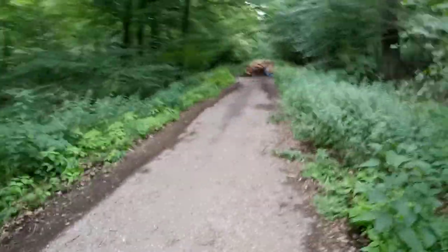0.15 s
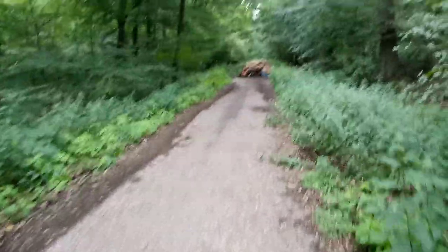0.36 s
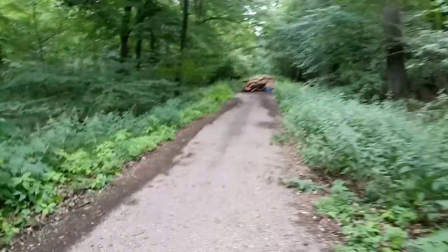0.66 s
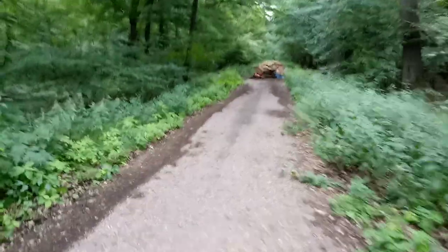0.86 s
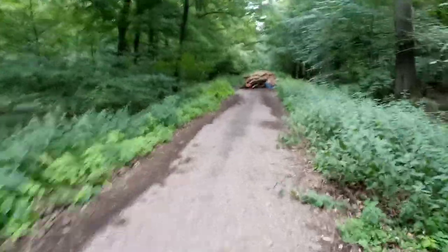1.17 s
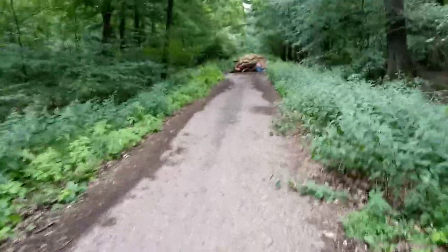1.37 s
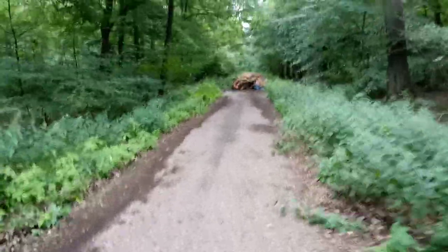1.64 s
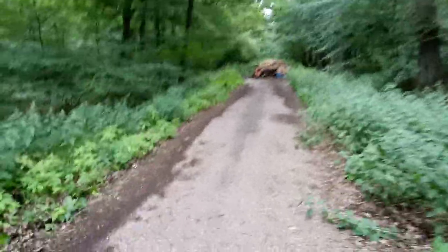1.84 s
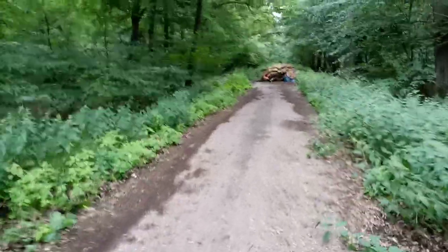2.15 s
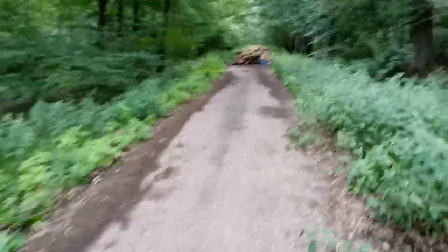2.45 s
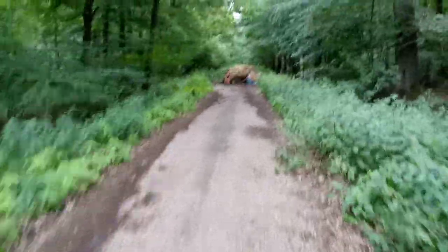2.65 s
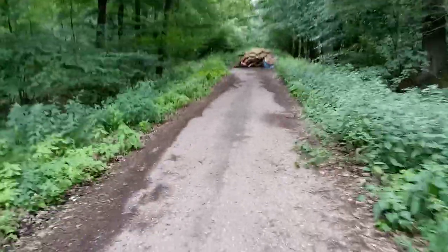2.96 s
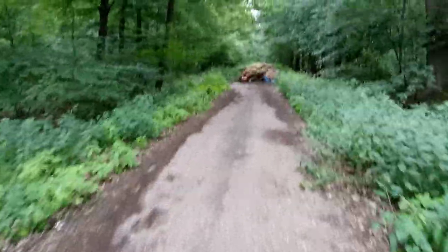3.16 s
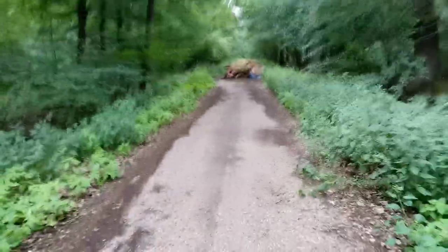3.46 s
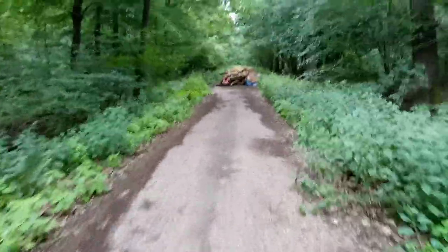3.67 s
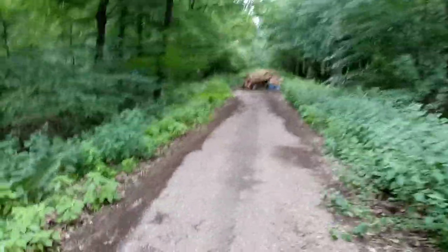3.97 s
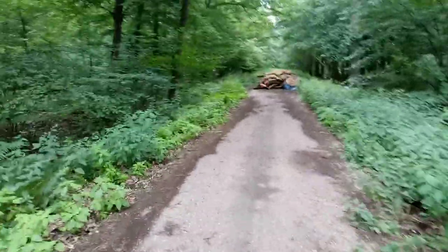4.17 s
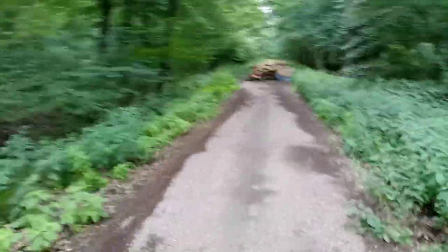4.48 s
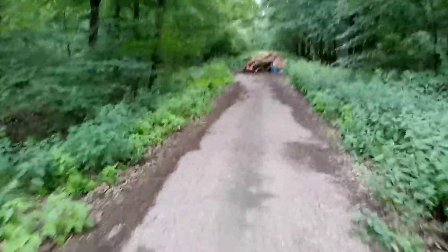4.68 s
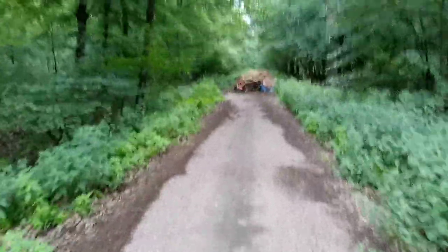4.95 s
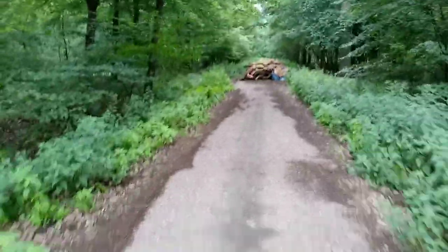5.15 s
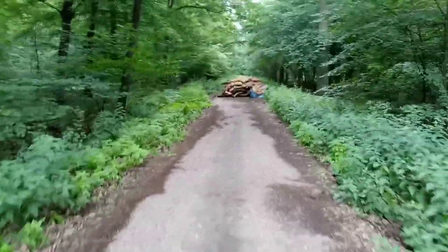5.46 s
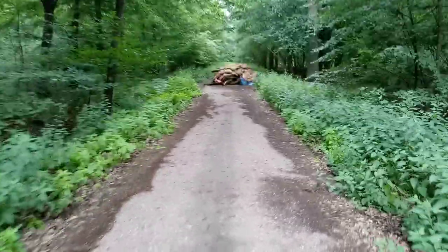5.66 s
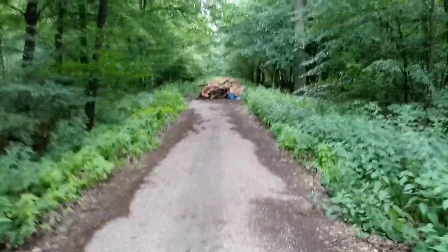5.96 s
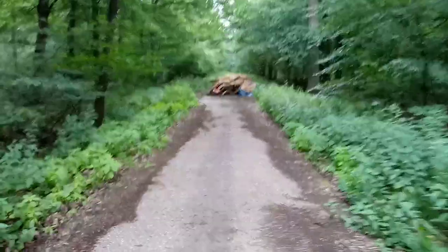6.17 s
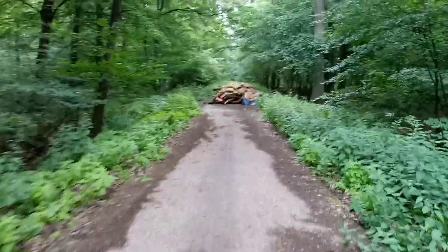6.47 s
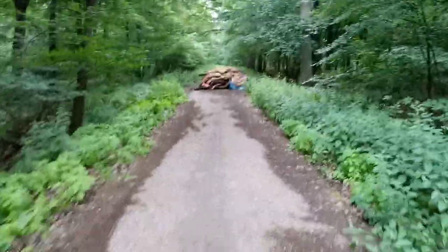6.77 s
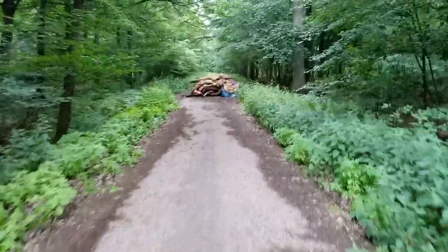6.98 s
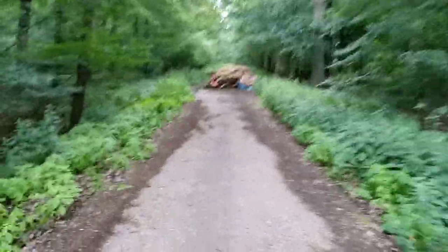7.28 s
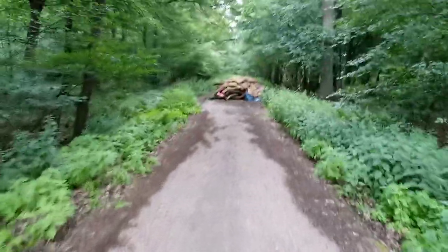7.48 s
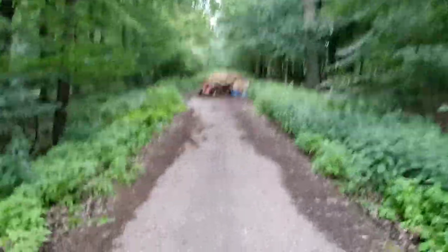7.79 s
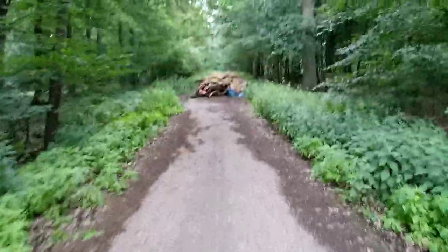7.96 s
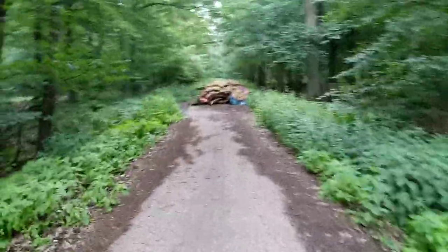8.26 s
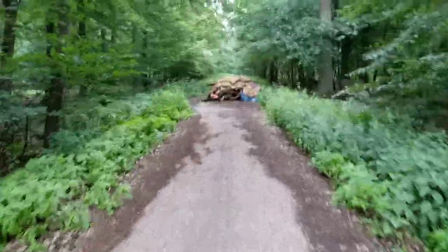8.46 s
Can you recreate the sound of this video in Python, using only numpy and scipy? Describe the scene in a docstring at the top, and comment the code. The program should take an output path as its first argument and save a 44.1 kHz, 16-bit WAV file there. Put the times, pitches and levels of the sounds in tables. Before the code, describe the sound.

Steady footsteps crunch softly on forest gravel while songbirds chirp and echo among trees, with dry clicks and one very loud snap near the end.

```python
"""Footsteps on a gravel forest path, walked with a hand-held camera: heel thuds are damped sines,
crunch and scrapes are filtered random grit hits. Songbirds are pitch-gliding tones echoed by the trees,
over a distant chorus and a low rumble, both shaped noise. Close to the microphone come filtered
clicks, a short stick-slip creak and one loud minimum-phase snap. Mono, the same in both channels."""
import sys
import numpy as np
from scipy import signal
from scipy.fft import rfft, irfft, next_fast_len
from scipy.io import wavfile

SR = 44100
rng = np.random.default_rng(int(sys.argv[2]) if len(sys.argv) > 2 else 0)


def to_wav(sig):
    """Store sig (one row per channel, or 1-D mono) as 16-bit WAV at the path in sys.argv[1].

    Samples outside -1..1 are clipped; the rate is SR.
    """
    pcm = np.clip(np.atleast_2d(sig), -1, 1) * 32767
    pcm = np.round(pcm).astype(np.int16)
    wavfile.write(sys.argv[1], SR, pcm.T)  # frames by channels


N = 380297
T = np.arange(N) / SR


def undb(db):
    """Decibels to gain."""
    return 10 ** (np.asarray(db) / 20)


def unit(x):
    """Scale to rms 1."""
    return x / np.sqrt(np.mean(x ** 2) + 1e-20)


def add(out, s, sound):
    """Mix a sound in at time s, cut to the ends of the scene."""
    i = int(s * SR)
    part = sound[max(-i, 0):max(N - i, 0)]
    out[max(i, 0):max(i, 0) + len(part)] += part


def level_db(points):
    """Level over the scene from (s, dB) points."""
    return np.interp(T, *np.transpose(points))


def shape(points, n):
    """Gain of a (Hz, dB) curve on the bins of an n-point spectrum."""
    hz, db = np.transpose(points)
    bins_hz = np.arange(n // 2 + 1) * SR / n + 1
    return undb(np.interp(np.log(bins_hz), np.log(hz), db))


def colour(x, points):
    """Give a sound a spectrum, at rms 1."""
    n = next_fast_len(len(x), True)
    return unit(irfft(rfft(x, n) * shape(points, n), n)[:len(x)])


def band(x, lo_hz, hi_hz, order=2):
    """Causal band-pass."""
    edges_hz = [min(lo_hz, hi_hz / 2 ** (1 / 10)), min(hi_hz, SR / 2 - 1)]
    return signal.sosfilt(signal.butter(order, edges_hz, "band", fs=SR, output="sos"), x)


def walk(rate, n):
    """Random drift: straight lines between normal draws, rate draws per second."""
    knots = rng.standard_normal(2048)
    return np.interp(np.arange(n) / SR * rate, np.arange(len(knots)), knots)


def clock(length_s):
    """Sample times of a short sound."""
    return np.arange(max(int(length_s * SR), 2)) / SR


# Each row: start in seconds, heel thud level in dB, crunch level in dB before halving.
STEPS = [(-.04, -60, -59), (.49, -42.5, -59.5), (1.0144, -42, -61.5), (1.561, -38.5, -53.5),
         (2.11, -58, -56.5), (2.633, -35.5, -57), (3.168, -38, -57.5), (3.729, -42.5, -57),
         (4.28, -58, -58), (4.799, -45, -58), (5.32, -56, -61.5), (5.9, -51, -63.5), (6.419, -43.5, -60),
         (6.979, -46.5, -58.5), (7.5, -46, -63), (8.09, -63, -59)]
# Relative spectrum of the crunch. Each row: frequency in Hz, gain in dB.
GRIT_SPECTRUM = [(300, 1.5), (700, -3), (1500, -5), (2600, -0.5), (4500, 0), (6500, -3), (8000, -13),
                 (10000, -37), (14000, -36)]
THUD_HZ = 131


def footsteps(thud_s=0.0038, heel_s=.035, roll_s=.11, sole_s=0.043, sole_db=-6,
              stones_per_s=480, spread_db=4.8, slip_db=3.2, count=8):
    """The heel thuds, then grit slips in fits under heel and sole; each size of stone ticks in its own band."""
    out, t = np.zeros(N), np.arange(SR // 2) / SR
    heel = t / heel_s * np.exp(1 - t / heel_s)
    sole = undb(sole_db) * np.exp(-.5 * ((t - roll_s) / sole_s) ** 2)
    load = heel + sole + .1 * np.exp(-t / .25)
    thud = np.sin(2 * np.pi * THUD_HZ * t) * (t / thud_s * np.exp(1 - t / thud_s)) ** 2
    edges_hz = np.geomspace(300, 14000, count + 1)
    for s, thud_db, grit_db in STEPS:
        stones, slipping = 0, load * undb(slip_db * walk(110, len(t)))
        for lo_hz, hi_hz in zip(edges_hz, edges_hz[1:]):
            rate = stones_per_s * hi_hz / 3000  # small stones are many, big ones few
            struck = rng.random(len(t)) < slipping * rate / SR
            size = undb(spread_db * np.minimum(rng.exponential(size=len(t)), 3.5))
            sign = rng.choice([-1, 1], len(t))
            hits = struck * sign * size * np.sqrt(slipping / rate)
            stones = stones + band(hits, lo_hz / 1.1, hi_hz * 1.15)
        add(out, s, undb(grit_db) / 2 * colour(stones, GRIT_SPECTRUM))
        add(out, s, undb(thud_db) * thud)
    return out


# Relative spectra of rumble, chorus and microphone noise. Each row: frequency in Hz, gain in dB.
RUMBLE_SPECTRUM = [(15, -46), (25, -16), (63, 0.5), (92, 0), (355, -5), (531, -12), (1520, -22.5),
                   (1870, -25), (2400, -20.5), (3120, -25), (5280, -120)]
CHORUS_SPECTRUM = [(1500, -20), (2300, -9), (3000, -2.5), (4300, 1.5), (5500, -2.5), (6500, -3.5),
                   (7300, -11), (8000, -22), (9500, -34.5), (11000, -42)]
HISS_SPECTRUM = [(6000, -14), (9000, -7), (12000, -6.5), (13800, -8), (14400, -2), (15000, 8.5),
                 (16000, -4)]
# Levels before the trims below. Each row: time in seconds, level in dB.
RUMBLE_LEVEL = [(0.0, -60), (2.06, -58.5), (2.25, -57.5), (3.53, -58.5), (7.37, -59.5), (8.62, -57)]
CHORUS_LEVEL = [(0.0, -60.5), (1.58, -58), (1.8, -57), (2.85, -58.5), (3.17, -58), (4.15, -59.5),
                (4.27, -55.5), (4.75, -57.5), (5.54, -62.5), (7.01, -59), (8.38, -61.5), (8.62, -60)]
# Gain of the rumble's low mids. Each row: time in seconds, gain in dB.
LOW_MIDS_GAIN = [(0, -2), (1, 0), (2.25, .5), (3.2, -.5), (4.3, -1), (5.1, 0.5), (6.6, 0.5), (7.3, -1),
                 (8.6, 1)]
# Gain of the chorus bands below LOW_VOICES_HZ. Each row: time in seconds, gain in dB.
LOW_VOICES_GAIN = [(0, -.5), (1.2, 0), (1.9, 1), (2.38, -3), (3.3, 1.5), (4.4, -0.5), (5.3, 1), (5.9, -4),
                   (6.35, -1), (6.7, -3), (7.3, 1.5), (8.6, 0.5)]
LOW_VOICES_HZ = 3600


def background(rumble_trim_db=1.48, chorus_trim_db=1.34, hiss_db=-78, flicker_db=2.5, count=12):
    """Low rumble, a far chorus whose pitches swell and fade on their own, and steady hiss: all shaped noise."""
    rumble_db = level_db(RUMBLE_LEVEL) + rumble_trim_db + 2.25 * walk(9, N)
    rumble = colour(rng.standard_normal(N), RUMBLE_SPECTRUM) * undb(rumble_db)
    rumble = rumble + band(rumble, 180, 620, order=1) * (undb(level_db(LOW_MIDS_GAIN)) - 1)
    low_db = level_db(LOW_VOICES_GAIN)
    edges_hz = np.geomspace(1500, 11000, count + 1)
    voices = np.zeros(N)
    for lo_hz, hi_hz in zip(edges_hz, edges_hz[1:]):
        voice_db = flicker_db * walk(12, N) + low_db * (hi_hz < LOW_VOICES_HZ)
        voices += band(rng.standard_normal(N), lo_hz, hi_hz) * undb(voice_db)
    chorus = colour(voices, CHORUS_SPECTRUM) * undb(level_db(CHORUS_LEVEL) + chorus_trim_db)
    return rumble + chorus + undb(hiss_db) * colour(rng.standard_normal(N), HISS_SPECTRUM)


# Knocks that rock the camera body. Each row: start in seconds, envelope peak in dB, frequency in Hz.
BUMPS = [(0.141, -45.5, 77.6), (7.714, -29.5, 154), (8.162, -41, 170), (8.204, -36.5, 142)]


def bumps(rise_cycles=0.45):
    """The camera body rocks briefly in the hand: a low sine that swells and dies within a few cycles."""
    out, t = np.zeros(N), np.arange(SR // 10) / SR
    for s, db, hz in BUMPS:
        u = t * hz / rise_cycles
        add(out, s, undb(db) * np.sin(2 * np.pi * hz * t) * u * np.exp(1 - u))
    return out


def glide(length_s, start_hz, end_hz, bend=0.91):
    """A pitch path that slows as it goes; bend below zero makes it speed up."""
    progress = (1 - np.exp(-bend * clock(length_s) / length_s)) / (1 - np.exp(-bend))
    return start_hz + (end_hz - start_hz) * progress


def arch(length_s, start_hz, middle_hz, end_hz):
    """A pitch path that rises, turns over and falls: a parabola through three pitches."""
    curve = np.polyfit([0, .5, 1], [start_hz, middle_hz, end_hz], 2)
    return np.polyval(curve, clock(length_s) / length_s)


def whistle(hz, db, warble, warble_hz=130, flutter_db=3, waver_hz=35, attack=0.086, release=0.18):
    """One bird note: a pure tone on a pitch path, with a fast warble and a fluttering level."""
    n = len(hz)
    u = np.arange(n) / n  # attack, release: shares of the note; warble: share of the pitch
    wobble = np.sin(2 * np.pi * np.cumsum(warble_hz * (1 + 0.153 * walk(120.4, n))) / SR)
    pitch_hz = hz * (1 + warble * wobble) + waver_hz * walk(200.5, n)
    swell = np.minimum(u / attack, 1) * np.minimum((1 - u) / release, 1)
    gain = swell * undb(db + flutter_db * walk(153, n))
    return gain * np.sin(2 * np.pi * np.cumsum(pitch_hz) / SR)


def trees(x, t60_s=0.98, treble_t60_s=0.6, onset_s=0.0096, wet_db=-2, dry_db=0):
    """Trunks and leaves scatter the song into a grainy echo whose treble fades first."""
    t = np.arange(SR) / SR
    scatter = rng.standard_normal(SR) ** 3 * (1 - np.exp(-t / onset_s))  # cubing makes it grainy
    low = signal.sosfiltfilt(signal.butter(2, 5500, fs=SR, output="sos"), scatter)
    echo = low * undb(-60 * t / t60_s) + (scatter - low) * undb(-60 * t / treble_t60_s)
    wet = signal.fftconvolve(x, echo / np.linalg.norm(echo))[:N]
    return undb(dry_db) * x + undb(wet_db) * wet


# Sagging whistles; the rows at 2.908 s and 3.008 s are weak repeats of the whistle at 2.845 s. Each row: start
# in seconds, length in seconds, pitch in Hz, level in dB.
WHISTLES = [(0.164, 0.05, 6630, -57.5), (.218, 0.028, 6330, -56), (2.145, .15, 7470, -56.5),
            (2.319, 0.11, 7210, -55), (2.632, 0.038, 3990, -49), (2.69, .075, 3990, -52.5),
            (2.845, 0.033, 4900, -43), (2.908, 0.032, 4880, -55), (3.008, 0.019, 4880, -55),
            (3.353, .03, 3810, -55), (3.379, 0.06, 3850, -54), (3.609, 0.095, 7280, -57),
            (5.18, 0.04, 7570, -59), (5.21, 0.087, 7380, -51), (5.443, 0.12, 7390, -52.5)]
SAG_HZ_PER_S, WHISTLE_WARBLE, WARBLE_AT_HZ = 920, .015, 7400  # warble share of the pitch at WARBLE_AT_HZ
# Drops onto a held pitch. Each row: start in seconds, length in seconds, held pitch in Hz, level in dB.
HOOKS = [(2.603, 0.026, 3750, -46.5), (4.577, 0.05, 5590, -50.5)]
HOOK_DROP, HOOK_S, HOOK_WARBLE = .25, .012, 0.021  # share above the held pitch, decay time, warble share
# Quick rises. Each row: start in seconds, length in seconds, start pitch in Hz, end pitch in Hz, level in dB.
FLICKS = [(2.927, .016, 3550, 4200, -53), (3.03, 0.015, 3600, 4300, -52), (3.449, .025, 4300, 5100, -45.5),
          (4.091, .013, 4310, 5720, -46), (4.132, .013, 4520, 5800, -52), (4.213, .013, 3790, 4720, -43.5),
          (4.273, .012, 4100, 6200, -46), (4.426, 0.015, 4880, 6620, -50), (4.66, .014, 5480, 6900, -54)]
FLICK_BEND = -0.79  # the rise speeds up
# Short slides. Each row: start in seconds, length in seconds, start pitch in Hz, end pitch in Hz, level in dB.
SLIDES = [(2.375, 0.045, 2504, 2490, -64), (2.504, 0.015, 4300, 3900, -46.5),
          (3.548, .016, 3890, 3600, -47), (3.66, .045, 3570, 3480, -54), (3.84, .03, 8700, 8000, -66),
          (3.895, 0.038, 3820, 3780, -57.5), (3.9, 0.023, 7520, 7670, -59.5), (4.02, .06, 2880, 2830, -60),
          (4.022, 0.067, 2340, 2150, -61), (4.03, .04, 7950, 7900, -62), (4.104, .016, 4350, 3855, -44.5),
          (4.133, .024, 3910, 3690, -50), (4.338, .07, 2950, 2334, -56.5), (4.44, .03, 2746, 2845, -59),
          (4.52, 0.038, 2910, 2920, -64), (4.592, 0.029, 2585, 2620, -57), (4.676, 0.0184, 4160, 4400, -49),
          (4.96, 0.066, 2680, 2980, -59), (5.155, 0.026, 3700, 3050, -54.5),
          (5.225, 0.055, 2780, 2620, -58), (5.195, .05, 5080, 5200, -57), (5.266, .02, 6550, 5250, -47),
          (5.295, 0.078, 5073, 5280, -49.5), (7.122, .1, 6980, 6580, -61), (7.52, .055, 5120, 5360, -53),
          (7.664, .048, 5210, 5480, -55)]
# Notes that turn over. Each row: start in seconds, length in seconds, start, middle and end pitch in Hz,
# level in dB.
ARCHES = [(2.489, .016, 4500, 5130, 4350, -46.5), (2.517, .014, 3840, 4170, 3750, -43),
          (3.507, 0.018, 4500, 5380, 4900, -49), (3.533, 0.014, 3750, 4050, 3750, -48),
          (4.121, .012, 3850, 4350, 3850, -41), (4.158, .011, 3650, 4110, 3700, -48),
          (4.197, 0.015, 3820, 4020, 3800, -45.5), (4.686, 0.019, 4400, 5100, 3400, -49.5),
          (4.861, 0.03, 6250, 8230, 5860, -54.5), (5.208, .018, 2550, 2780, 2760, -57),
          (8.52, .04, 6480, 6620, 6150, -58)]
# Warbled buzzes. Each row: start in seconds, length in seconds, start pitch in Hz, end pitch in Hz,
# level in dB, warble as a share of the pitch.
BUZZES = [(.273, .035, 4900, 4350, -51.5, .04), (3.475, 0.02, 4750, 4840, -47, .06),
          (4.217, 0.045, 9020, 9550, -58.5, 0.079), (4.241, 0.04, 7180, 6700, -49.5, 0.11),
          (4.705, 0.1, 4490, 4484, -49, 0.078), (4.852, .022, 3750, 3800, -54, .06),
          (4.835, 0.062, 5600, 5200, -52, .12), (4.949, .06, 4620, 4560, -51.5, .02),
          (4.982, .11, 4120, 4050, -50.5, 0.045), (5.1, .1, 4100, 4000, -55.5, .05)]
BUZZ_RATE_HZ = 175


def birds():
    """The near singers: sagging whistles, falling hooks, rising flicks, slides, arches and buzzes."""
    out = np.zeros(N)
    for s, length_s, hz, db in WHISTLES:
        warble = WHISTLE_WARBLE * (hz / WARBLE_AT_HZ) ** 2  # lower whistles are steadier
        add(out, s, whistle(hz - SAG_HZ_PER_S * clock(length_s), db, warble))
    for s, length_s, hz, db in HOOKS:
        path_hz = hz * (1 + HOOK_DROP * np.exp(-clock(length_s) / HOOK_S))
        add(out, s, whistle(path_hz, db, HOOK_WARBLE))
    for s, length_s, start_hz, end_hz, db in FLICKS:
        add(out, s, whistle(glide(length_s, start_hz, end_hz, FLICK_BEND), db, 0))
    for s, length_s, start_hz, end_hz, db in SLIDES:
        add(out, s, whistle(glide(length_s, start_hz, end_hz), db, .006, waver_hz=50))
    for s, length_s, start_hz, middle_hz, end_hz, db in ARCHES:
        path_hz = arch(length_s, start_hz, middle_hz, end_hz)
        add(out, s, whistle(path_hz, db, .012, warble_hz=211, flutter_db=2.5, waver_hz=50))
    for s, length_s, start_hz, end_hz, db, warble in BUZZES:
        add(out, s, whistle(glide(length_s, start_hz, end_hz), db, warble, warble_hz=BUZZ_RATE_HZ))
    return out


CLICK_WIDTH_HZ = 1910


def tick(hz, chatter_db=-25, chatter_s=0.002, skirt_db=-13, uneven_db=3.5, second_db=-20, second_ratio=3.1):
    """A dry tick at peak 1: contact and chatter ring a broad band and a weak higher one, over a wide skirt."""
    t = np.arange(SR // 50) / SR
    lo_hz, hi_hz = max(hz - CLICK_WIDTH_HZ / 2, hz / 4), hz + CLICK_WIDTH_HZ / 2
    chatter, second = undb(np.array([chatter_db, second_db]) + uneven_db * rng.uniform(-1, 1, 2))
    contact = (t == 0) + chatter * rng.standard_normal(len(t)) * np.exp(-t / chatter_s)
    second_hz = min(second_ratio * hz, 6500)
    main = band(contact, lo_hz, hi_hz, order=4)
    skirt = undb(skirt_db) * band(contact, lo_hz / 3, min(2 * hi_hz, 7000), order=4)
    higher = 2 * second * band(contact, .9 * second_hz, 1.1 * second_hz)
    sound = main + skirt + higher
    return sound / np.abs(sound).max()


# Each row: time in seconds, peak in dB before the trim, centre frequency in Hz.
CLICKS = [(.313, -44.5, 800), (1.5998, -24, 1510), (1.6457, -37, 2900), (1.6865, -34, 1740),
          (1.6983, -32, 1850), (1.7002, -35, 1600), (1.797, -40, 1100), (1.906, -40.5, 1150),
          (2.2535, -32.5, 2220), (2.549, -34, 2370), (2.557, -38, 2090), (2.638, -40, 1100),
          (2.6665, -45, 1100), (2.673, -38, 2610), (2.747, -44, 1500), (2.785, -44, 1600),
          (3.197, -43, 1690), (3.223, -41, 2500), (3.529, -44, 800), (3.771, -41, 2200), (3.809, -39, 2800),
          (4.366, -33.5, 3200), (4.675, -41, 600), (4.749, -42, 2200), (4.804, -43, 1900),
          (4.807, -46, 1400), (5.406, -38, 5270), (6.116, -43.5, 800), (6.3418, -35, 2720),
          (6.458, -35.5, 2560), (6.547, -45, 1800), (6.97, -30, 4500), (7.143, -48, 7460),
          (7.49, -45, 1400), (7.82, -34.5, 2700), (7.955, -42, 3030), (8.0144, -29, 1440),
          (8.0175, -29.5, 1450), (8.0427, -34, 1500), (8.0476, -38, 1700), (8.133, -38, 4540),
          (8.1514, -32.5, 4740), (8.1603, -24.5, 1070)]


def clicks(trim_db=-1):
    """Sharp dry clicks close by, pebbles knocked by the feet among them."""
    out = np.zeros(N)
    for s, db, hz in CLICKS:
        add(out, s - .0004, undb(db + trim_db) * tick(hz))
    return out


# Each row: start in seconds, length in seconds, centre frequency in Hz, level in dB.
SCRAPES = [(0.483, .025, 2900, -58), (1.062, .035, 2700, -57.5), (1.662, .04, 1600, -62),
           (2.145, 0.04, 2410, -62), (2.68, .11, 1700, -65), (3.212, .04, 2900, -55.5),
           (6.5, .035, 2500, -60.5), (7.995, .065, 1700, -61)]


def scrapes(width_octaves=1.0):
    """A sliding sole drags many tiny stones at once: a short, dense rasp of band-passed spiky noise."""
    out = np.zeros(N)
    half_width = 2 ** (width_octaves / 2)
    for s, length_s, hz, db in SCRAPES:
        n = len(clock(length_s))
        grains = rng.laplace(size=n) * np.hanning(n)
        add(out, s, undb(db) * unit(band(grains, hz / half_width, hz * half_width)))
    return out


# Runs of like sweeps. Each row: start in seconds, end in seconds, period in seconds, sweep length in seconds,
# start pitch in Hz, end pitch in Hz, level in dB at mid-run before the echo.
TRILLS = [(0.707, 1.72, 0.12, 0.036, 6395, 4150, -50), (1.704, 2.04, 0.134, 0.017, 4830, 6180, -50),
          (2.562, 3.1, .095, .024, 3700, 2860, -53.5)]


def trills(ends_db=-1.5):
    """A singer deeper among the trees repeats one sweep, loudest in the middle of each run."""
    out = np.zeros(N)
    for start_s, end_s, period_s, length_s, start_hz, end_hz, db in TRILLS:
        for s in np.arange(start_s, end_s, period_s):
            from_middle = 2 * (s - start_s) / (end_s - start_s) - 1
            sweep_db = db + ends_db * from_middle ** 2
            add(out, s, whistle(glide(length_s, start_hz, end_hz), sweep_db, 0, flutter_db=2.5,
                                waver_hz=110, attack=0.14, release=0.4))
    return trees(out, t60_s=1.0, treble_t60_s=.7, onset_s=0.0042, wet_db=.8, dry_db=0)


# Each row: start in seconds, length in seconds, start pitch in Hz, end pitch in Hz, level in dB before the echo.
FAR_WHISTLES = [(2.22, .13, 3740, 3640, -62.5), (5.715, 0.062, 6090, 6180, -63),
                (5.91, .09, 5130, 5310, -59), (6.069, .27, 4830, 4685, -65.5),
                (6.218, .03, 5800, 6150, -61), (6.724, .08, 4400, 4340, -60.5),
                (6.869, .075, 4950, 4835, -55), (7.372, .08, 4420, 4210, -60.5),
                (7.747, .05, 4750, 4400, -63.5), (8.39, .035, 3670, 3620, -60),
                (8.48, .08, 4560, 4480, -64), (8.558, .055, 3730, 3580, -59)]


def far_whistles():
    """Singers deep in the wood: pure, nearly steady tones with a long echo."""
    out = np.zeros(N)
    for s, length_s, start_hz, end_hz, db in FAR_WHISTLES:
        add(out, s, whistle(glide(length_s, start_hz, end_hz), db, 0, flutter_db=2.5, waver_hz=20))
    return trees(out, t60_s=1.1, wet_db=-1.5, dry_db=-1.5)


# Relative spectrum of the crack. Each row: frequency in Hz, gain in dB.
SNAP_SPECTRUM = [(100, -11.5), (600, -0.5), (1500, -1.5), (2200, -12), (2900, -3), (3600, 2), (4500, -0.5),
                 (5200, -8.5), (6400, -2.5), (7200, -14), (7800, -27), (10000, -23.5), (13500, -38),
                 (15000, -26)]
SNAP_S, SNAP_PEAK_DB = 7.7141, -7.5


def snap(lag_hz=2300, ring_hz=3600, size=1024):
    """One hard, very short crack right at the microphone; its lows and its ring trail the first edge."""
    cepstrum = irfft(np.log(shape(SNAP_SPECTRUM, size)))
    crack = irfft(np.exp(rfft(2 * cepstrum[:size // 2], size)))  # minimum phase: energy comes first
    for poles in signal.butter(2, lag_hz, fs=SR)[1], signal.iirpeak(ring_hz, 1, fs=SR)[1]:
        crack = signal.lfilter(poles[::-1], poles, crack)  # all-pass: delays only
    crack = band(crack, 130, 16000)
    out = np.zeros(N)
    add(out, SNAP_S, undb(SNAP_PEAK_DB) * crack / np.abs(crack).max())
    return out


# Each row: time in seconds, slips per second, relative strength in dB.
CREAK = [(7.9805, 1430, -9), (7.984, 3200, -3.5), (7.987, 2400, -1.5), (7.988, 1080, 1), (7.992, 950, 0)]


def creak(peak_db=-31, rough=.1, rub=0.076):
    """The grip slips: a thin, fast squeak that drops into a few slower, stronger stick-slip pulses."""
    times_s, rate_hz, strength_db = np.transpose(CREAK)
    t = times_s[0] + clock(times_s[-1] - times_s[0])
    n = len(t)
    turns = np.cumsum(np.interp(t, times_s, rate_hz) * (1 + rough * walk(920, n))) / SR
    slips = np.diff(np.floor(turns), prepend=0)  # one pulse per whole turn
    rubbing = (slips + rub * rng.standard_normal(n)) * undb(np.interp(t, times_s, strength_db))
    sound = band(np.pad(rubbing, (0, n)), 580, 1900)
    out = np.zeros(N)
    add(out, times_s[0], undb(peak_db) * sound / np.abs(sound).max())
    return out


def scene():
    """Everything reaches one microphone, the same in both channels."""
    ground = footsteps() + scrapes()
    song = trees(birds(), wet_db=-1.5, dry_db=-.5) + trills() + far_whistles()
    close = clicks() + snap() + bumps() + creak()
    mono = ground + song + close + background()
    return np.array([mono, mono])


TOP_HZ = 15800


def record(dry):
    """The recorder cuts the top with a steep elliptic low-pass."""
    return signal.sosfilt(signal.ellip(10, .2, 70, TOP_HZ, fs=SR, output="sos"), dry)


dry = scene()
out = record(dry)
to_wav(out)
```